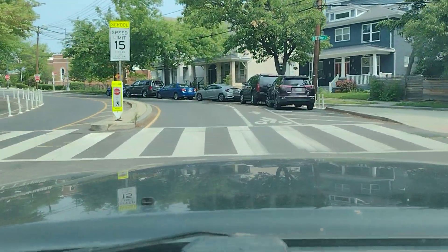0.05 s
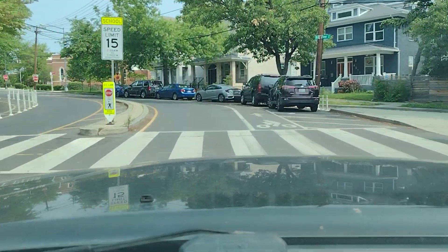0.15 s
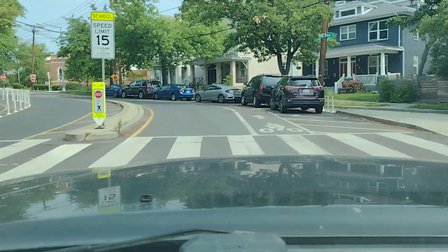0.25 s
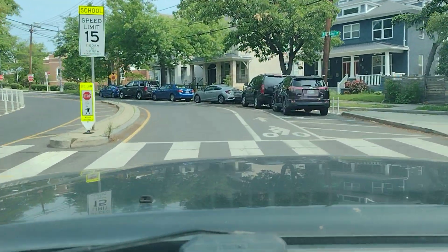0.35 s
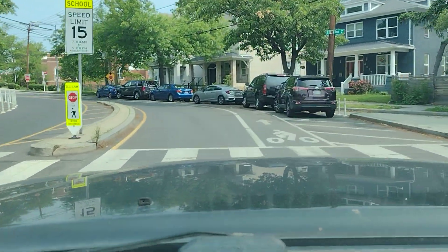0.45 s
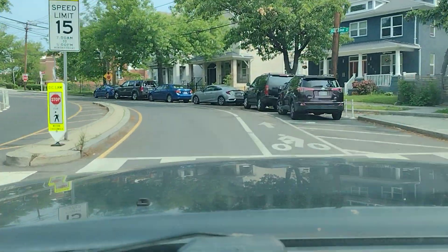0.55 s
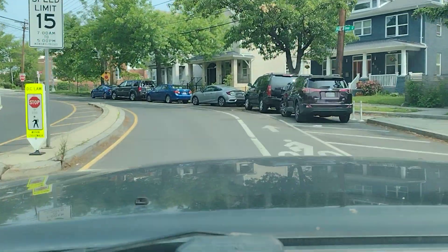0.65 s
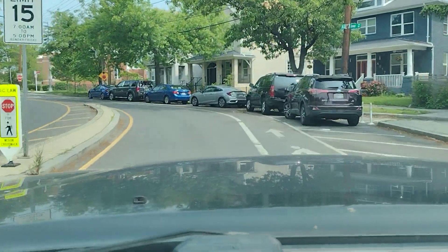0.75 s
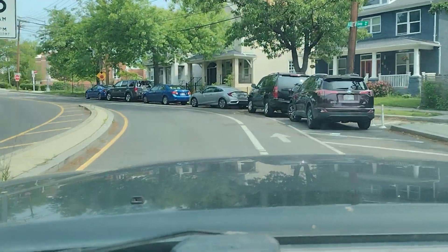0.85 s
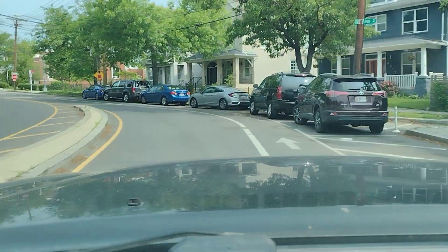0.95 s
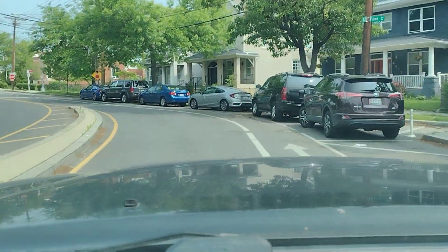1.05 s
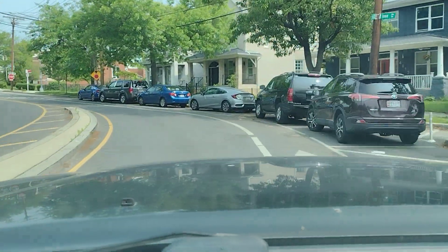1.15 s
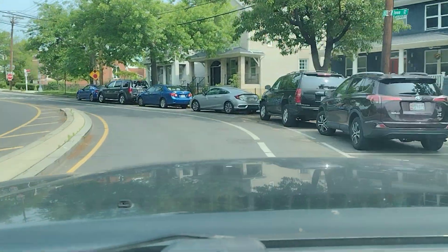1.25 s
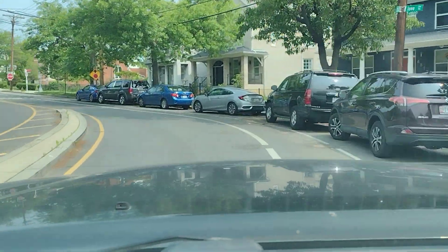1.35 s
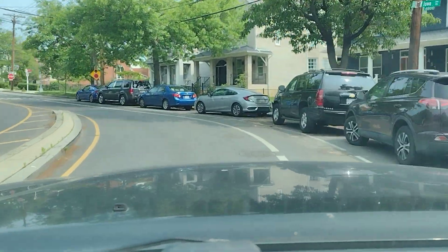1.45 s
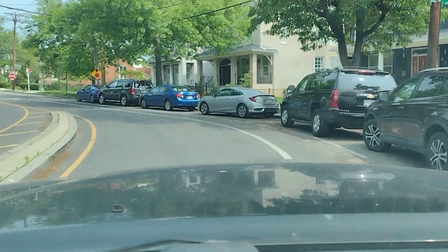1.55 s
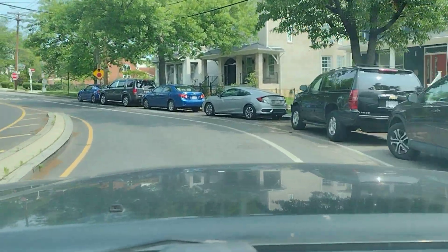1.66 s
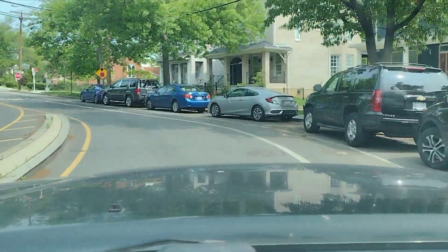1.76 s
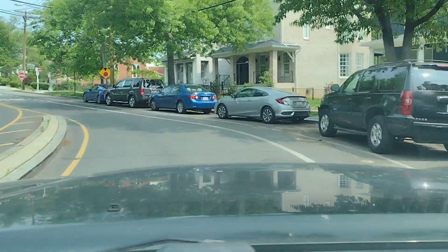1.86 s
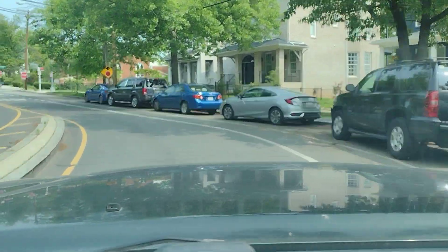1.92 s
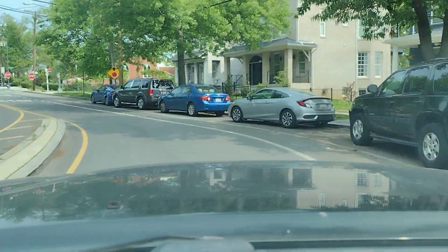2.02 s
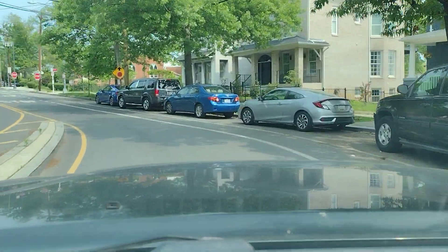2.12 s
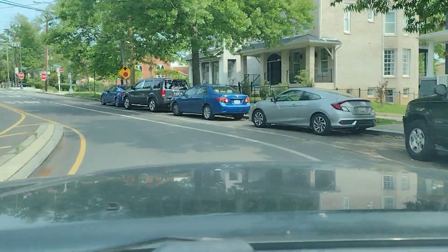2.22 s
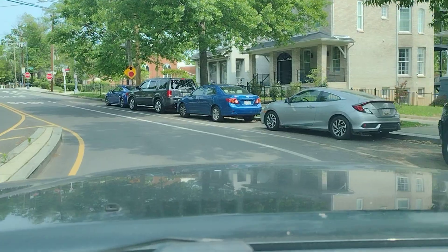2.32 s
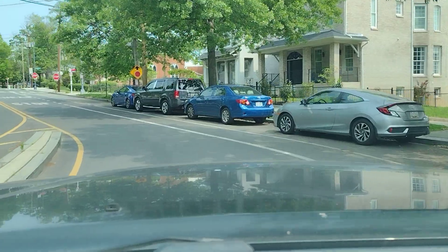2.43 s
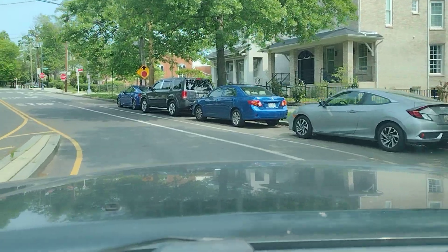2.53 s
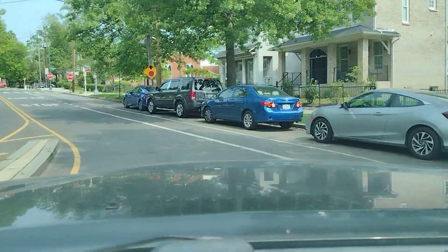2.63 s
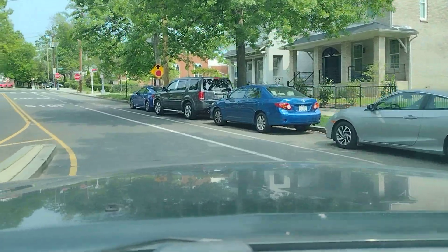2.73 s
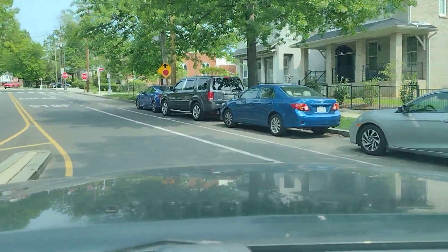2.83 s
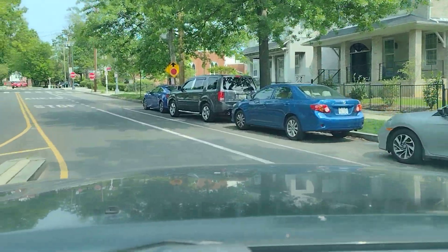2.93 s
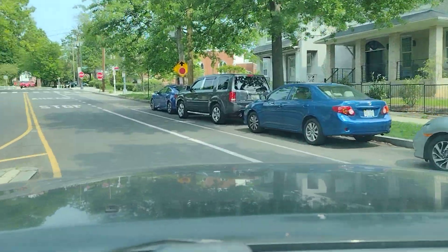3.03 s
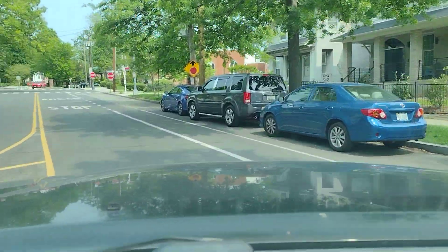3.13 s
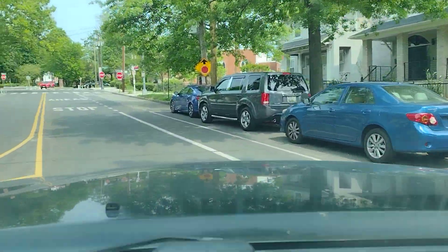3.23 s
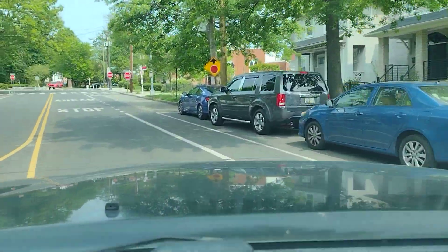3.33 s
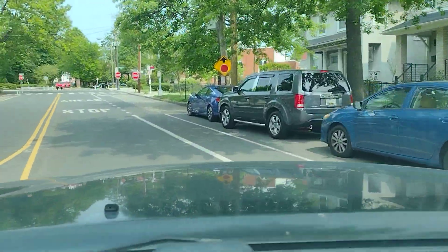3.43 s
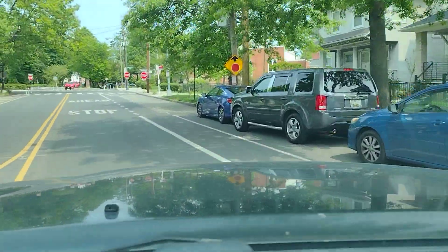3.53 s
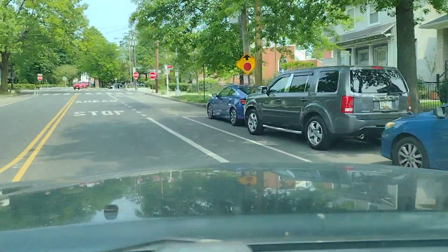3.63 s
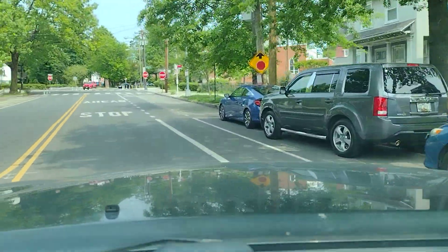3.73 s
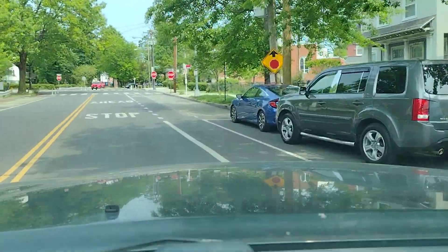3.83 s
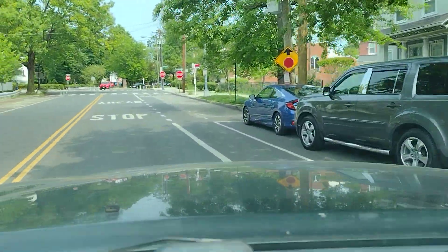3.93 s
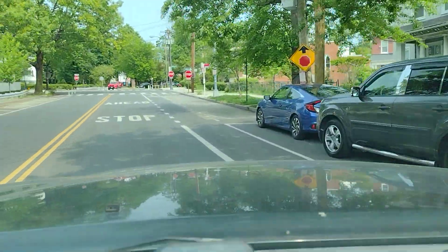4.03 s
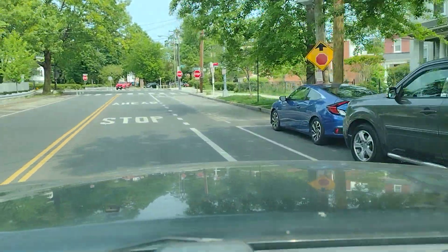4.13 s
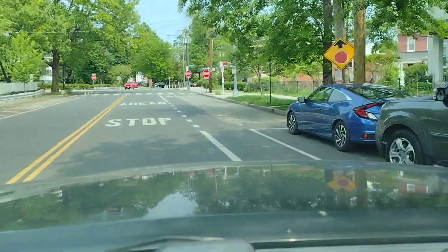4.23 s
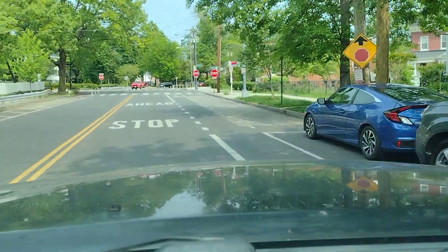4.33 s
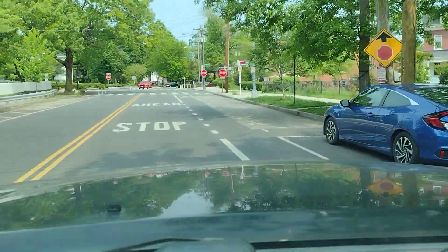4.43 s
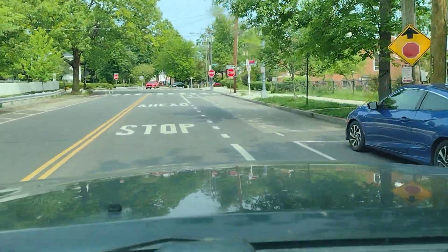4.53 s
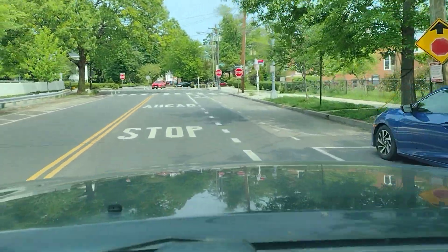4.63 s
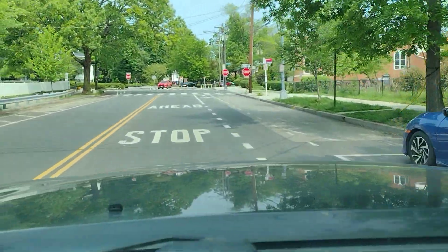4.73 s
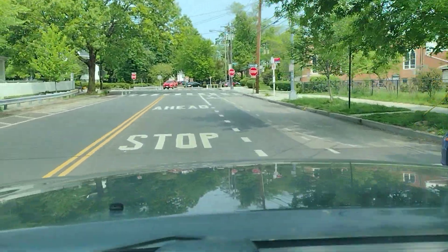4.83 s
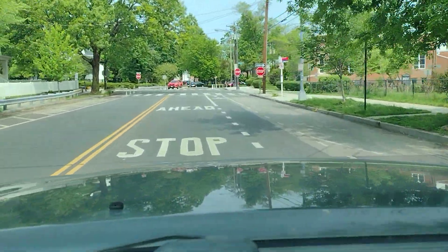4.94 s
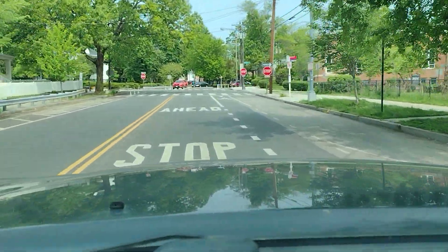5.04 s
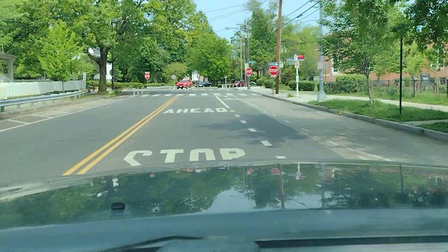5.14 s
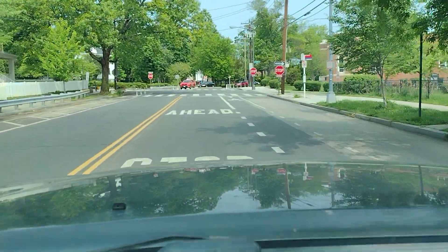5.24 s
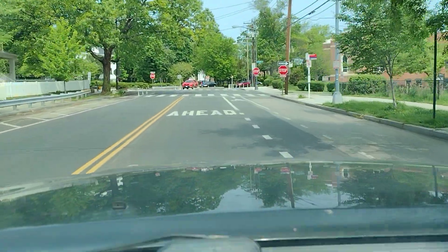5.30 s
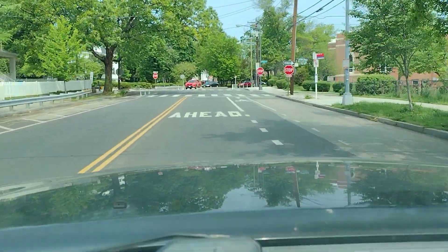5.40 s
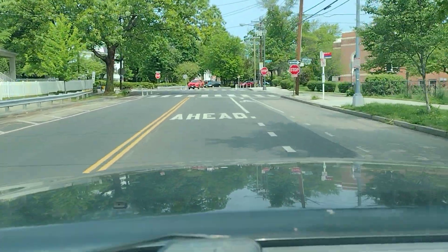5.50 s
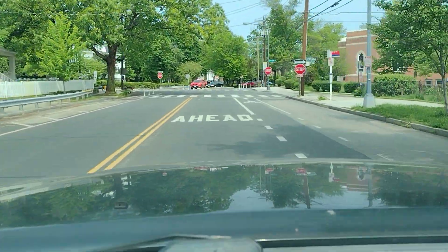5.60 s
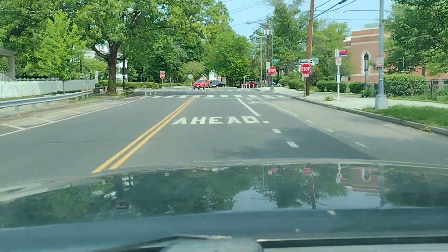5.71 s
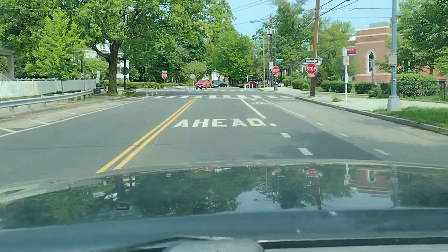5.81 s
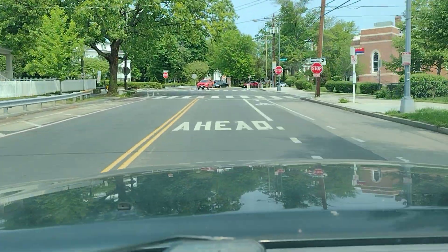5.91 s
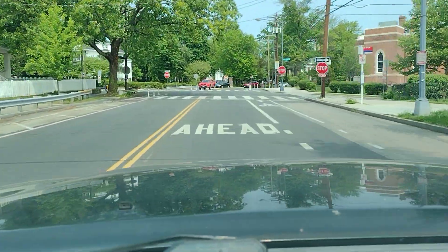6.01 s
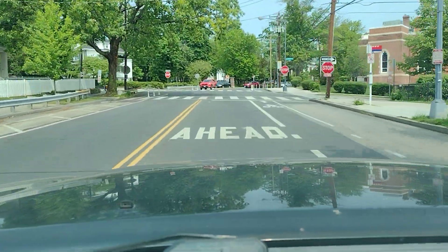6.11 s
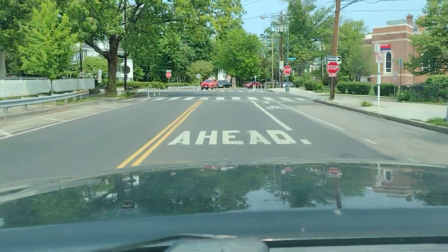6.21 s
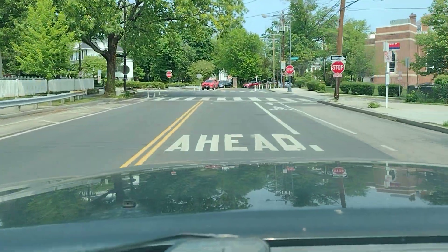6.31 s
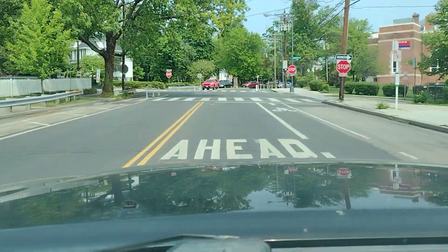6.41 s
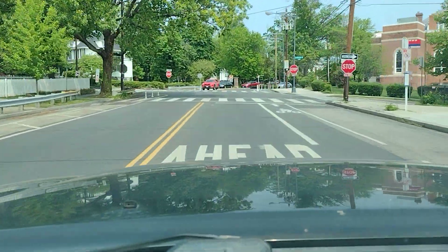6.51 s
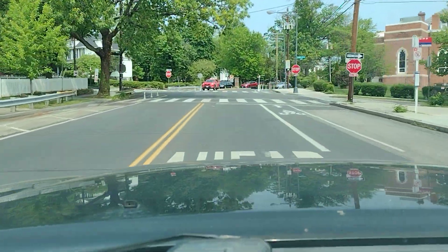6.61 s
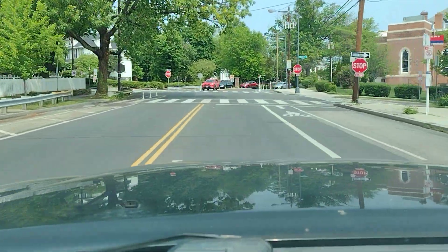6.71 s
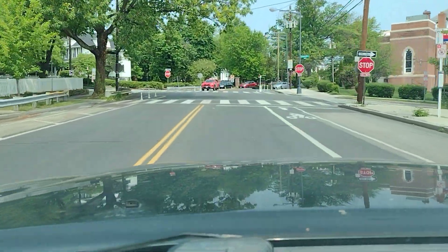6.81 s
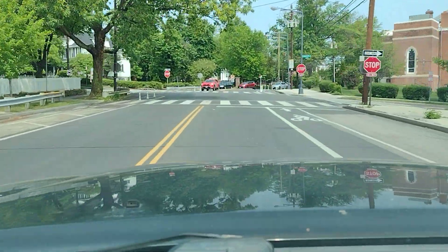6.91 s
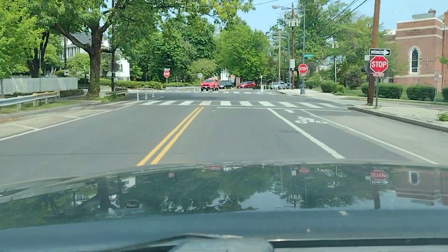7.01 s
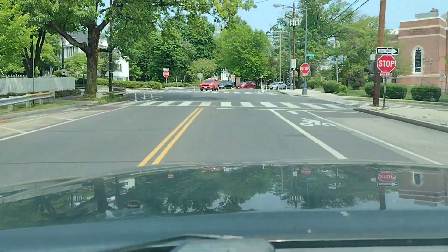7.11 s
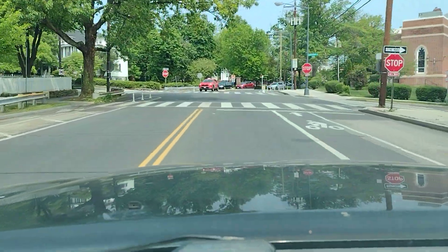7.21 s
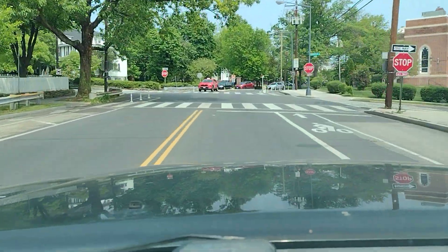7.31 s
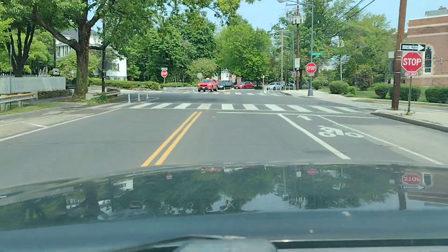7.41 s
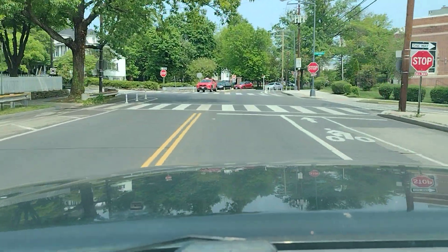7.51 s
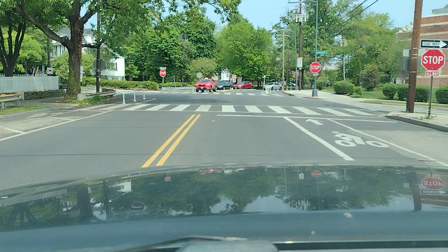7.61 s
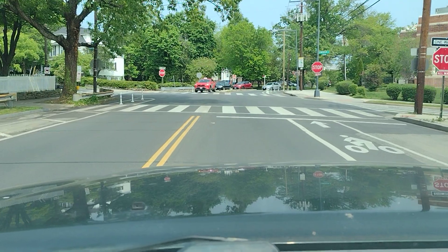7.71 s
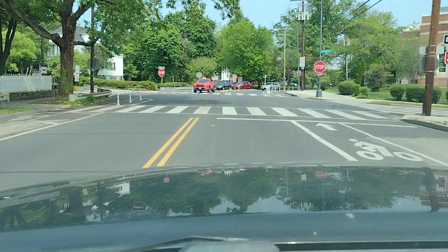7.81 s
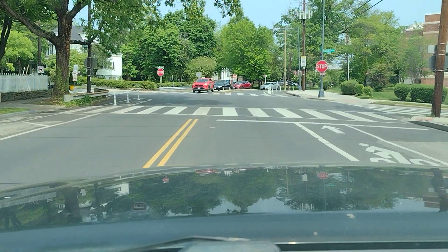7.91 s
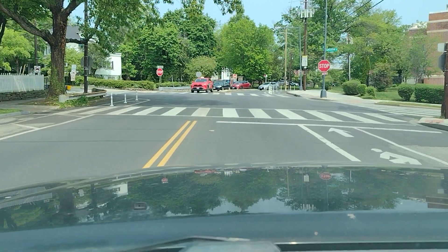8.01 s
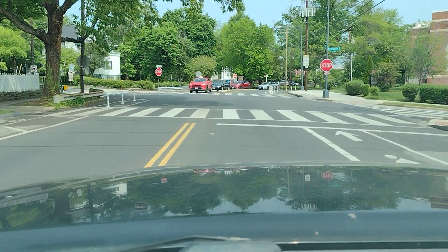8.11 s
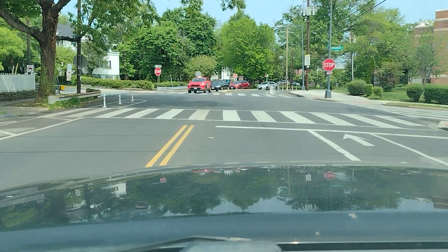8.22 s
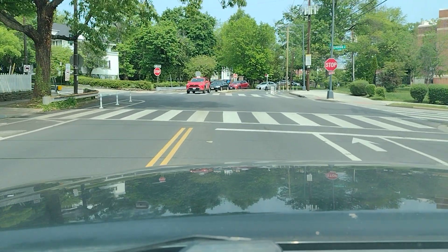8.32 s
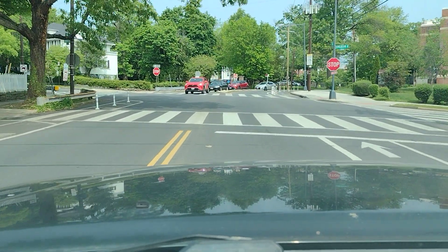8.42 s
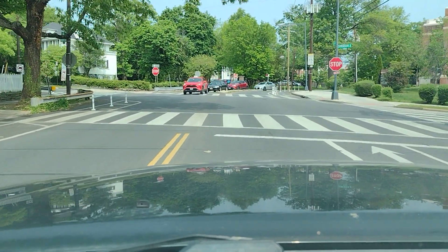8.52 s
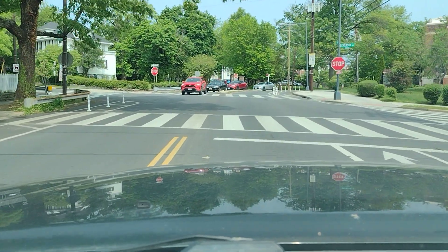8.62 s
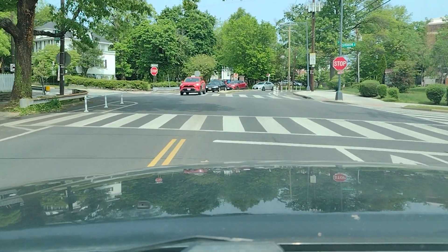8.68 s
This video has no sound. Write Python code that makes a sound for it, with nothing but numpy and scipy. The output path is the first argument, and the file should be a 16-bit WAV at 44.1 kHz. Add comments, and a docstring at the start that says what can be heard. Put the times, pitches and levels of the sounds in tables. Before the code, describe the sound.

Inside a car rolling along a quiet residential street, microphone on the dashboard. A low tyre hum around 130 Hz throbs nearly four times a second over deep body rumble, muffled asphalt roar and faint hiss. Trim rattles lightly from the start, with a clear cluster of dry plastic ticks at 0.9-1.15 s, mostly right. Until about 2.3 s a distant bird repeats soft falling whistles. The hum strengthens from 1.4 s, fullest near 4 s; coarse patches roar more around 3 and 5-5.6 s. A weak engine tone sits underneath until 5.9 s; a thin, barely audible whine follows from 4.3 to 7.3 s. At 5.4 s a hand brushes the wheel. The hum dips at 6.15 s, then slides down toward 100 Hz, smoother and quieter, with a faint brake moan near 7-7.6 s and a faint chirp at 8.3 s.

```python
"""Tyre tread hum in a car rolling slowly and braking: a sine at the block rate, throbbing once a wheel turn,
with blurred tones for the other tyres. Shaped noise gives road rumble, body, roar and hiss; moving sines give
engine, whine and a brief brake moan. Trim ticks are clusters of short modes, grit pricks are very high decaying
sines, a hand on the wheel is bright noise, and birds outside are gliding sines with an echo."""
import sys
import numpy as np
from scipy import signal
from scipy.fft import rfft, irfft, next_fast_len
from scipy.io import wavfile
from scipy.ndimage import uniform_filter1d, map_coordinates

SR = 44100
rng = np.random.default_rng(int(sys.argv[2]) if len(sys.argv) > 2 else 0)


def store_wav(level_fs):
    """Save 16-bit WAV to argv[1]."""
    pcm = np.round(np.clip(np.atleast_2d(level_fs), -1, 1) * 32767)
    wavfile.write(sys.argv[1], SR, pcm.T.astype(np.int16))


def convert_level_to_amplitude(level_db):
    """Map a level in decibels to its linear amplitude factor."""
    exponent = np.asarray(level_db, float) / 20
    return 10 ** exponent


N = 385875
TIME = np.arange(N) / SR

# tread block rate: (time [s], rate [Hz])
SPEED = [(0, 130.3), (.6, 138.4), (1.4, 135.4), (2.2, 133.3), (3, 132.8), (3.6, 132.7), (4.2, 131.8),
         (5, 129.7), (5.6, 128.8), (6.15, 131.1), (6.5, 123.7), (7, 121.3), (7.5, 116.2), (7.9, 108.9),
         (8.2, 102.5), (8.5, 100.5), (8.75, 98.5)]
CRUISE_HZ = 133  # block rate at cruise
# road surface: (time [s], tread hum level [dB], asphalt coarseness [dB])
SURFACE = [(0, -30.5, 2.2), (.3, -32.5, -.5), (.6, -35, -2.5), (.9, -29, .2), (1.27, -29, -.8),
           (1.4, -24.5, -1.3), (2.2, -25.5, -.2), (2.55, -24.5, 1.8), (3.1, -24.3, 2.5), (3.55, -22.5, .8),
           (4.1, -21.5, -1.2), (4.5, -23.5, .6), (4.95, -25.5, 3.5), (5.2, -24.5, 1.8), (5.53, -25.5, 3.8),
           (5.85, -27.5, -.8), (6.15, -37, -1.8), (6.7, -31, -2), (7, -28, -2.3), (7.3, -29.5, -3),
           (7.92, -33, -4), (8.08, -27.5, -4), (8.4, -28.5, -4), (8.52, -35, -4), (8.75, -32, -4)]


def unit(x):
    """Scales to rms 1."""
    return x / np.sqrt(np.mean(x ** 2) + 1e-20)


def along(points, hz):
    """Interpolates (Hz, value) points on a log frequency axis."""
    f, v = np.transpose(points)
    return np.interp(np.log(hz + 1), np.log(f + 1), v)


def shaped(points):
    """Gain as a function of frequency, from (Hz, dB) points."""
    return lambda hz: convert_level_to_amplitude(along(points, hz))


def curves(rows, t=TIME):
    """One value per sample for each column after the time."""
    s, *cols = np.transpose(rows)
    return [np.interp(t, s, c) for c in cols]


def during(rows):
    """1 between the first and last row, with 20 ms ramps inside."""
    return np.clip(np.minimum(TIME - rows[0][0], rows[-1][0] - TIME) / .02, 0, 1)


def wobble(rate):
    """Smooth random curve with rate knots a second."""
    return map_coordinates(rng.standard_normal(int(N * rate / SR) + 4), [TIME * rate])


def filtered(x, response):
    """Multiplies the spectrum of x by a response of frequency."""
    m = next_fast_len(N + 8192)
    return irfft(rfft(x, m) * response(np.fft.rfftfreq(m, 1 / SR)), m)[..., :N]


def tone(hz):
    """Sine of rms 1 on a moving pitch."""
    return np.sqrt(2) * np.sin(2 * np.pi * np.cumsum(hz) / SR)


def pan(x, db):
    """Two channels, left louder by db."""
    return x * convert_level_to_amplitude([[db / 2], [-db / 2]])


def rush(gain, patchy_db):
    """Noise of the cabin's diffuse field, rms 1, with random gain patches in time and frequency."""
    # left-right likeness: (frequency [Hz], correlation [-1..1])
    alike = [(30, .96), (170, .92), (260, .74), (340, .56), (440, .33), (560, -.13), (700, -.28),
             (850, -.62), (1000, -.74), (1200, -.5), (1450, 0), (1750, .2), (2600, 0)]
    z = signal.stft(rng.standard_normal((2, N)), nperseg=512)[2]
    field = uniform_filter1d(rng.standard_normal(z.shape[1:]), size=6, axis=0)
    field = uniform_filter1d(field, size=12, axis=1)
    pair = signal.istft(z * convert_level_to_amplitude(patchy_db * unit(field)), nperseg=512)[1][:, :N]

    def mid_side_gain(hz):
        angle = np.arccos(np.clip(along(alike, hz), -1, 1)) / 2
        return gain(hz) * [np.cos(angle), np.sin(angle)]

    mid, side = filtered(pair, mid_side_gain)
    return unit(np.array([mid + side, mid - side]))


def birds():
    """Birds repeat glides, slightly varied in pitch; leaves break them up and the street smears them."""
    # glides: (time in note [s], pitch [Hz], relative level [dB])
    whistle_glide = [(0, 4300, -13), (.008, 3540, -2), (.035, 3330, -2), (.06, 3020, 0), (.09, 2820, 1),
                     (.15, 2370, -1), (.205, 2030, -1), (.285, 1680, -7)]
    cheep_glide = [(0, 4100, -22), (.028, 3850, -9), (.045, 4300, -3), (.056, 4400, 1), (.062, 3550, 1),
                   (.08, 4100, 0), (.09, 3550, 0), (.104, 4200, 0), (.115, 3050, 1), (.14, 3900, -8)]  # a sparrow's low voice
    over_glide = [(0, 4700, -40), (.028, 4700, -16), (.036, 4800, -6), (.048, 4900, -12), (.062, 5000, -3),
                  (.085, 5000, -11), (.2, 4950, -20)]  # its high voice
    peep_glide = [(0, 5000, -10), (.008, 5000, 0), (.026, 4950, 0), (.034, 4950, -10)]  # short and flat
    # notes: (start [s], level [dB])
    song = [(-.14, -66), (.288, -63.5), (0.718, -63), (1.153, -61), (1.584, -65), (2.012, -65.5)]
    cheeps = [(3.52, -75), (8.3, -67)]
    peeps = [(7.495, -76)]
    # (glide, notes, pitch blur [Hz], echo level [dB])
    voices = [(whistle_glide, song, 60, -4), (cheep_glide, cheeps, 310, 5),
              (over_glide, cheeps, 140, 2), (peep_glide, peeps, 30, -6)]
    echo_t60_s = .45
    t = np.arange(SR // 3) / SR
    out = np.zeros((2, N))
    for glide, notes, blur_hz, echo_db in voices:
        direct = np.zeros(N)
        for s, note_db in notes:
            hz, db = curves(glide, TIME - s)
            on = (TIME > s) & (TIME < s + glide[-1][0])
            pitch_hz = hz * rng.normal(1, .008) + blur_hz * wobble(450)
            direct += on * tone(pitch_hz) * convert_level_to_amplitude(db + note_db)
        street = rng.standard_normal((2, len(t))) * convert_level_to_amplitude(-60 * t / echo_t60_s)
        street /= np.linalg.norm(street[0])
        echo = signal.fftconvolve(direct[None], street, axes=1)[:, :N]
        flutter_db = 3.2 * wobble(40) + 2.5 * np.array([wobble(50), wobble(50)])
        out += direct * convert_level_to_amplitude(flutter_db) + convert_level_to_amplitude(echo_db) * echo
    return pan(out, 3)


def brake_moan():
    """The brakes moan faintly: a sine with wavering pitch and level."""
    # (time [s], pitch [Hz], level [dB])
    moan_track = [(6.85, 388, -60), (7.05, 386, -55), (7.35, 385, -56), (7.5, 384, -50.5), (7.62, 383, -58)]
    hz, db = curves(moan_track)
    return tone(hz + 4 * wobble(20)) * convert_level_to_amplitude(db + 3 * wobble(10)) * during(moan_track)


def whine():
    """Thin wavering whine: a high sine with jittered pitch and level."""
    # (time [s], pitch [Hz], level [dB])
    whine_track = [(4.3, 2680, -85), (4.6, 2700, -72), (5, 2720, -76), (5.45, 2720, -72), (5.65, 2680, -79),
                   (5.8, 2680, -67.5), (6.3, 2685, -69), (6.7, 2700, -76), (7.3, 2700, -80)]
    hz, db = curves(whine_track)
    thin = tone(hz + 11 * wobble(40)) * convert_level_to_amplitude(db + 3 * wobble(15)) * during(whine_track)
    return pan(thin, 1.5)


def engine():
    """One engine order: a sine on a moving pitch, its level wavering."""
    # (time [s], pitch [Hz], level [dB])
    engine_track = [(.8, 189, -49), (1.7, 184, -47), (2.5, 177, -47), (3.5, 175, -48), (4.5, 180, -47.5),
                    (5.1, 183, -46), (5.85, 177, -47)]
    hz, db = curves(engine_track)
    return tone(hz) * convert_level_to_amplitude(db + 2.2 * wobble(9)) * during(engine_track)


def hand():
    """Skin slides over the steering wheel: bright noise swelling and fading in dB per second."""
    # slides: (peak time [s], peak level [dB], rise over 20 dB [s], fall over 20 dB [s])
    slides = [(5.432, -56, .16, .055), (5.44, -65.5, .38, .32), (7.1, -77.5, .15, .15),
              (7.53, -76.5, .15, .12)]
    # skin noise: (frequency [Hz], relative density [dB/Hz])
    skin = [(3000, -36), (6000, -6), (7000, -10), (8300, -1), (10500, -4), (13000, -1), (15000, 3),
            (15800, 1)]
    envelope = np.zeros(N)
    for s, db, rise_s, fall_s in slides:
        envelope += convert_level_to_amplitude(db - 20 * np.maximum((s - TIME) / rise_s, (TIME - s) / fall_s))
    a, b = rng.standard_normal((2, N)) * convert_level_to_amplitude(1.1 * wobble(60))
    friction = unit(filtered(np.array([a, .6 * a + .8 * b]), shaped(skin)))
    return pan(envelope * friction, 6.5)


def grit():
    """Grit in the tread pricks: four very high sines per channel, decaying within milliseconds."""
    # (time [s], nominal peak [dB])
    pricks = [(2.2174, -69), (2.4703, -65), (2.7377, -65), (2.8918, -68), (3.2735, -67), (4.3455, -64),
              (4.8903, -67), (5.1612, -62), (5.7159, -60), (7.3821, -67)]
    pitch_hz, decay_s = 14300, .0015
    out, t = np.zeros((2, N)), np.arange(300) / SR
    for s, db in pricks:
        hz = pitch_hz * rng.uniform(.9, 1.08, (4, 2, 1))
        prick = np.sin(2 * np.pi * hz * t).sum(0) * np.exp(-t / decay_s)
        out[:, round(s * SR):][:, :len(t)] += convert_level_to_amplitude(db - 6) * prick
    return out


def ticks():
    """Loose trim ticks: snaps ringing clusters of short modes, listed, shaken regularly or faint at random."""
    # (time [s], nominal peak [dB], left minus right [dB], gain of modes below 3 kHz [dB])
    listed = [(0.2522, -58.5, -11, 2), (0.343, -54, -2.5, 19), (0.7122, -53, 5.5, -6),
              (0.8129, -50, -11.5, 1), (0.9072, -36.5, -8.5, 4), (0.9454, -47, -2.5, -4),
              (1.0005, -32, -12, 2.5), (1.015, -50, -8, -10), (1.0434, -51, -11.5, -3),
              (1.0505, -50, -11, 15), (1.0947, -44, -18, 8), (1.0979, -34, -12, 3), (1.1415, -50, 1.5, -6),
              (1.1465, -60, 1.5, 16), (1.3458, -55, 4.5, 7), (1.5443, -57, -6, 12), (1.6344, -56, 3.5, 13),
              (1.9788, -49, -4.5, .1), (2.1968, -51, 6.5, 3), (2.386, -60, -.5, 15),
              (2.7696, -50, -1.5, -6), (2.8464, -51, -4, -6), (2.9446, -47, -6, -.6), (3.3996, -49, -4, -6),
              (3.7883, -53, -4.5, -6), (4.114, -53, -5, -1), (4.1658, -51, -2.5, 1),
              (4.9292, -51, -5.5, -4), (6.1738, -50, 3.5, 6), (6.565, -48.5, -7, -.6), (7.442, -53, 14, -5),
              (7.6943, -53.5, 2.5, .1), (7.9482, -55, 3.5, 9)]
    # mode clusters: (centre [Hz], relative level [dB], t60 [s])
    trim = [(650, 3, .022), (1200, 0, .017), (2200, 0, .017), (3700, -4, .011), (5400, -1, .011),
            (9500, -15, .004)]
    shake_from_s, shake_to_s, shake_period_s, shake_jitter_s = .012, 2.3, .0482, .004
    shake_db, faint_db = -57.5, -60.5  # centres of the random peak levels
    beats = np.arange(shake_from_s, shake_to_s, shake_period_s)
    spread = rng.uniform(-1.7, 1.7, (len(beats), 3))
    shaken = [(s + shake_jitter_s * c, shake_db + 3 * a, -4 + 4 * b, -3) for s, (a, b, c) in zip(beats, spread)]
    when = rng.uniform(0, 1, 80) ** 1.4 * 7.5  # rattling eases as the car slows
    faint = [(s, faint_db + 3 * a, -5 + 4 * b, -6) for s, a, b in zip(when, *rng.standard_normal((2, 80)))]
    out, t = np.zeros((2, N + SR)), np.arange(800) / SR
    onset = 1 - np.exp(-t / .0003)
    for s, db, pan_db, knock_db in list(listed) + shaken + faint:
        ring = np.zeros((2, len(t)))
        for hz, mode_db, t60 in trim:
            detune = np.linspace(-.33, .33, 12)[:, None, None] + .04 * rng.standard_normal((12, 1, 1))
            phase = .26 * rng.standard_normal((12, 2, 1))  # cycles: scattered starts soften the snap
            cluster = np.sin(2 * np.pi * (hz * np.exp(detune) * t + phase)).sum(0)
            ring += cluster * convert_level_to_amplitude(mode_db + knock_db * (hz < 3000) + rng.normal(0, 1.5) - 60 * t / t60)
        out[:, round(s * SR):][:, :len(t)] += pan(convert_level_to_amplitude(db - 11) * ring * onset, pan_db)
    return out[:, :N]


def road():
    """Asphalt shakes the body, roars through the floor and hisses past the windows, by speed and coarseness."""
    # layer spectra: (frequency [Hz], relative density [dB/Hz])
    rumble_spectrum = [(10, -40), (20, -16), (39, -3), (52, -6), (68, 2), (84, -3), (105, 2), (150, -2),
                       (180, -30), (400, -120)]
    body_spectrum = [(110, -38), (165, 1), (210, -2), (300, -6), (400, -10), (480, -10.5), (560, -31),
                     (1500, -120)]
    roar_spectrum = [(380, -41.5), (530, -1), (910, 1), (1070, -8), (2000, -16), (2750, -18), (3200, -29.5),
                     (4200, -45.5), (9000, -120)]
    hiss_spectrum = [(2000, -59.5), (3000, -4.5), (4200, -1.5), (5200, -6), (6200, -5), (7200, -17.5),
                     (8600, -17), (12000, -62)]
    # cabin resonances in the roar: (centre [Hz], width [Hz], boost [dB])
    cabin_modes = [(935, 60, 5), (1170, 70, 7), (1450, 70, 8.5), (1720, 90, 8), (2100, 80, 6)]
    # cabin balance: (frequency [Hz], left minus right [dB])
    lean = [(60, -.5), (130, 2), (210, -1), (800, -.3), (4000, -.5)]
    speed, coarse_db = curves(SPEED)[0] / CRUISE_HZ, curves(SURFACE)[1]

    def law(cruise_db, exponent, db_per_coarse_db):
        return convert_level_to_amplitude(cruise_db + db_per_coarse_db * coarse_db) * speed ** exponent

    def ringing(hz):
        boost_db = sum(db / (1 + (2 * (hz - c) / w) ** 2) for c, w, db in cabin_modes)
        return convert_level_to_amplitude(along(roar_spectrum, hz) + boost_db)

    rumble = law(-33.1, .4, -.1) * rush(shaped(rumble_spectrum), patchy_db=.8)
    body = law(-38.1, 2.1, .12) * rush(shaped(body_spectrum), patchy_db=.34)
    ring_share = np.clip(.68 + .13 * coarse_db, 0, 1)  # power share, more on coarse asphalt
    roar = np.sqrt(ring_share) * rush(ringing, patchy_db=1.8)
    roar += np.sqrt(1 - ring_share) * rush(shaped(roar_spectrum), patchy_db=1.3)
    roar *= law(-44.4, 1.5, .9) * convert_level_to_amplitude(.35 * wobble(9))
    hiss = law(-71.7, -.4, 1.85) * convert_level_to_amplitude(1.2 * wobble(25)) * rush(shaped(hiss_spectrum), patchy_db=.6)
    return filtered(rumble + body + roar + hiss, lambda hz: convert_level_to_amplitude(along(lean, hz) * [[.5], [-.5]]))


def tread():
    """Blocks lengthen round the tyre: the hum falls each turn, beats three times and breaks at the seam."""
    blocks_per_turn, first_turn = 36.54, .2  # first_turn: part of a turn done at the start
    crawl_hz = 123  # block rate at which the seam is no longer felt
    sweep, seam_turns, seam_depth, fade_db, beat = .07, .1, .94, -3, .25
    others_rms = .38  # relative to the hum
    rate_hz, = curves(SPEED)
    turn = (first_turn + np.cumsum(rate_hz) / SR / blocks_per_turn) % 1
    seam_felt = np.clip((rate_hz - crawl_hz) / (CRUISE_HZ - crawl_hz), 0, 1)
    seam = 1 - seam_depth * seam_felt * np.exp(-(np.minimum(turn, 1 - turn) / seam_turns) ** 2)
    throb = seam * convert_level_to_amplitude(fade_db * turn) * (1 - beat * np.cos(6 * np.pi * turn))
    throb = uniform_filter1d(throb, size=400)
    hum = tone(rate_hz * (1 + sweep * (1 - 2 * turn))) * throb * convert_level_to_amplitude(1.3 * wobble(30))
    # the other tyres blur together
    others = tone(.95 * rate_hz) * np.array([wobble(40), wobble(40)]) * .6
    others = others + tone(.97 * rate_hz) * wobble(40)
    mix = convert_level_to_amplitude(curves(SURFACE)[0]) * (unit(hum) + others_rms * unit(others))
    # leans left at speed, right when slow
    return mix * convert_level_to_amplitude((rate_hz - 113) * .13 * np.array([[.5], [-.5]]))


def scene():
    """Sums everything heard at the dashboard."""
    outside = birds()
    car = brake_moan() + whine() + engine()
    details = hand() + grit() + ticks()
    return outside + car + details + road() + tread()


def roll_off(x):
    """The treble ends steeply here."""
    return signal.sosfilt(signal.butter(12, 15780, fs=SR, output="sos"), x)


def record(dry):
    """The microphones add a faint hiss, independent in each channel."""
    # microphone noise: (frequency [Hz], relative density [dB/Hz])
    self_noise = [(2000, -25), (6000, 2.5), (10000, -1), (15700, -1.5)]
    noise = unit(filtered(rng.standard_normal((2, N)), shaped(self_noise)))
    mix = dry + convert_level_to_amplitude(-78.5) * noise
    return roll_off(mix)


dry = scene()
out = record(dry)
store_wav(out)
```